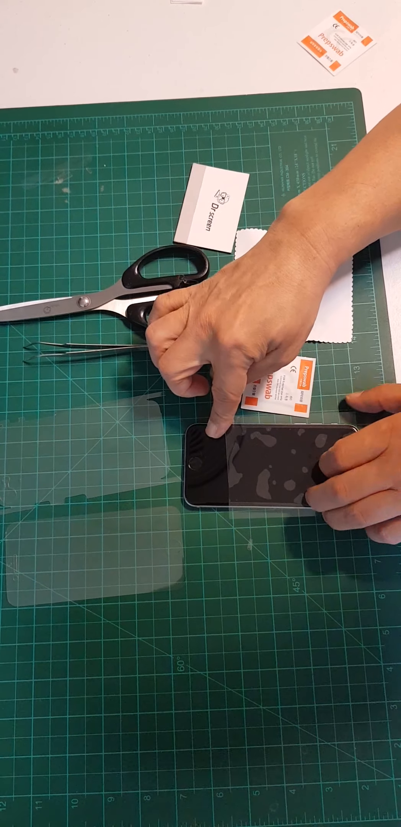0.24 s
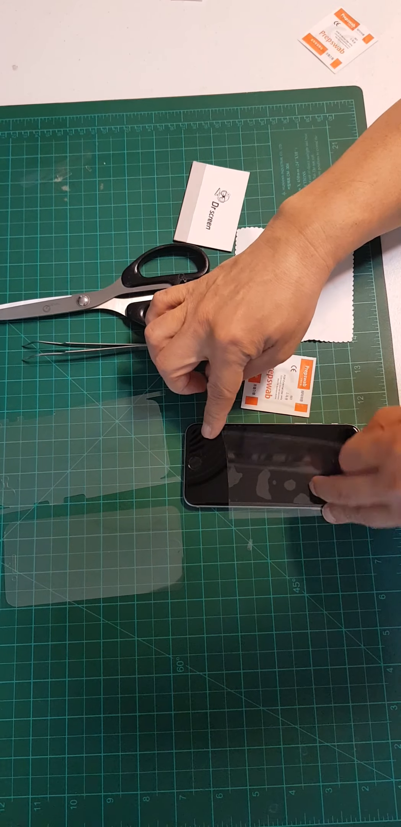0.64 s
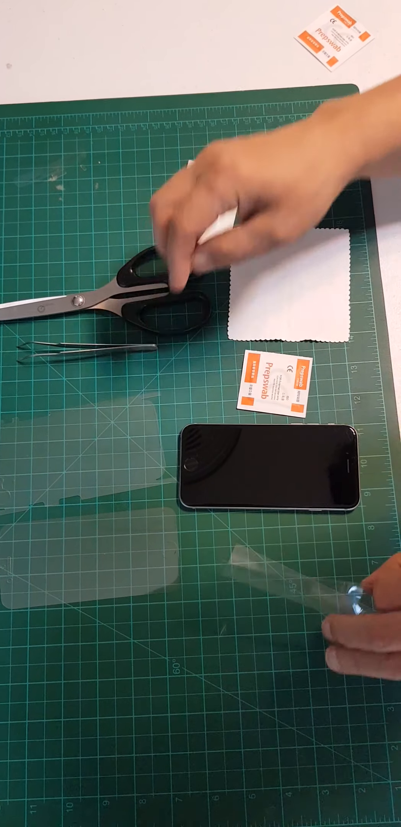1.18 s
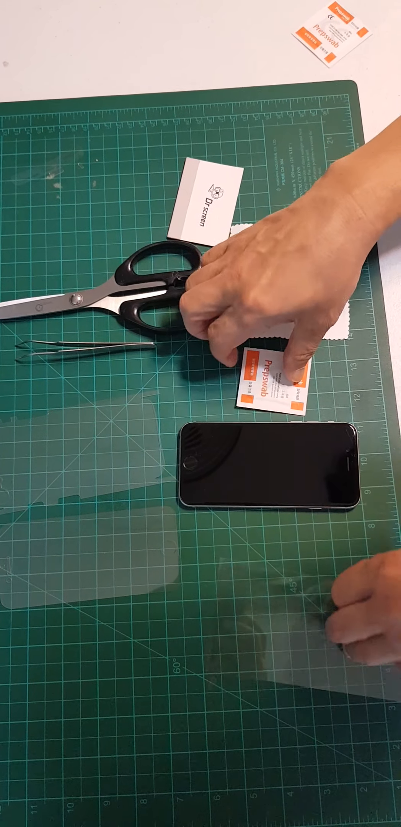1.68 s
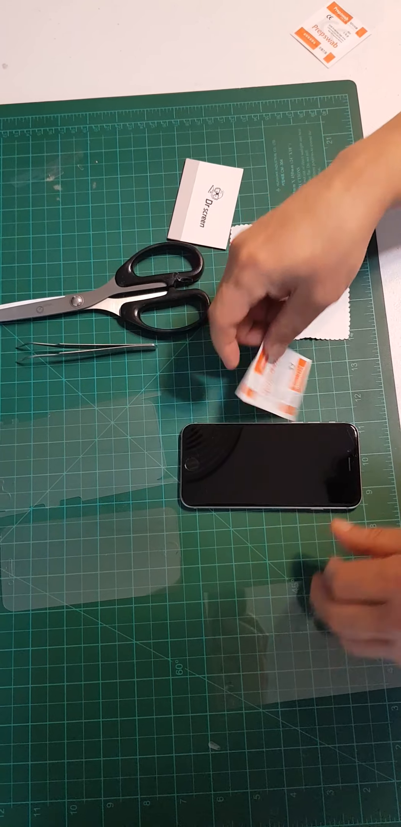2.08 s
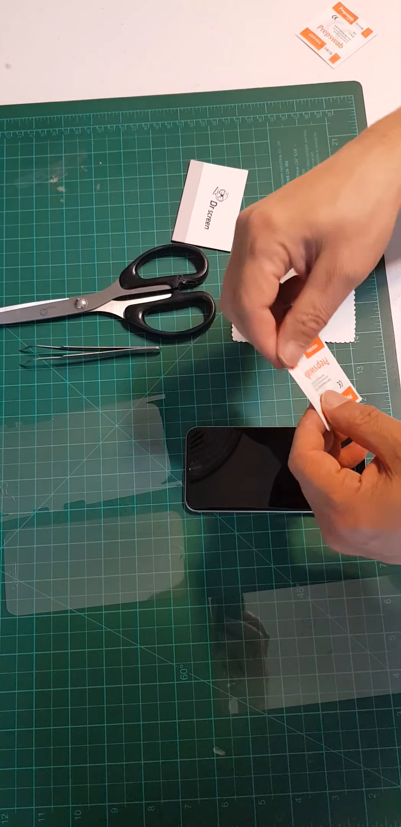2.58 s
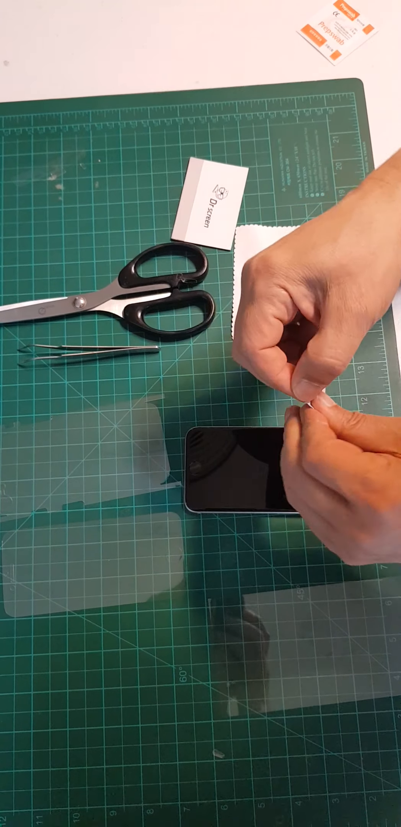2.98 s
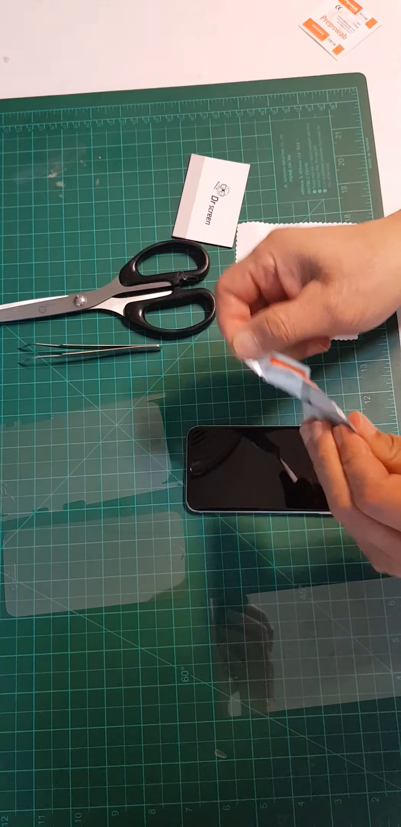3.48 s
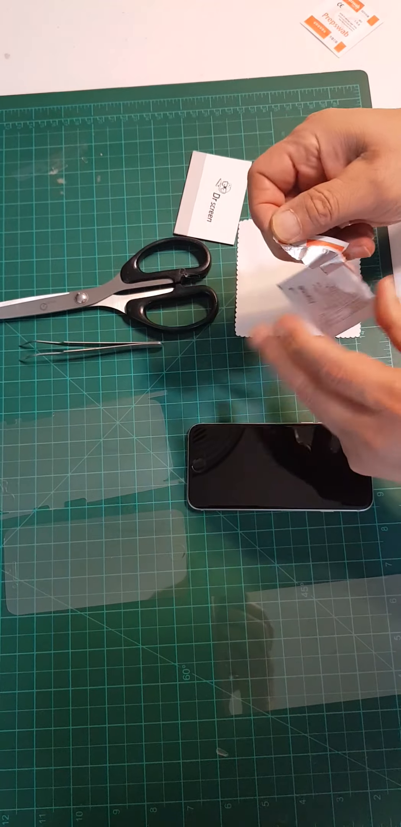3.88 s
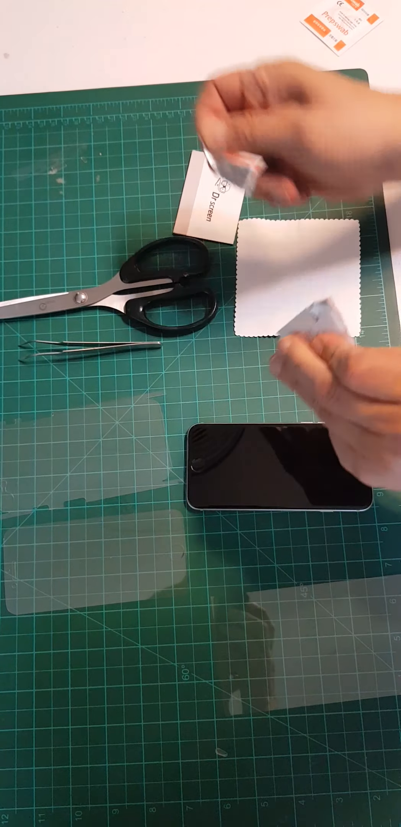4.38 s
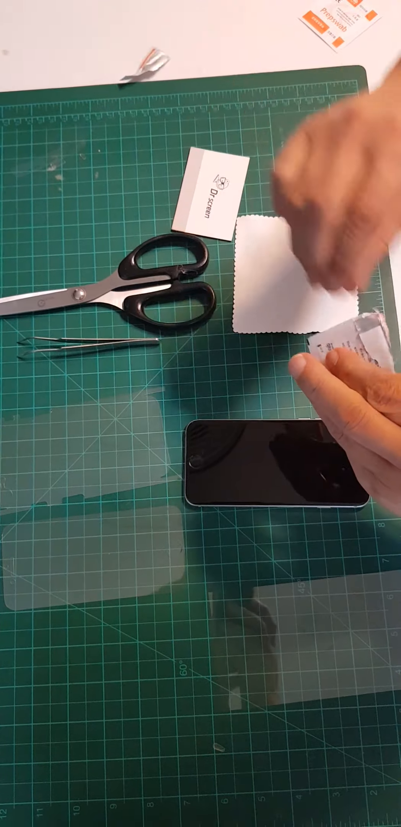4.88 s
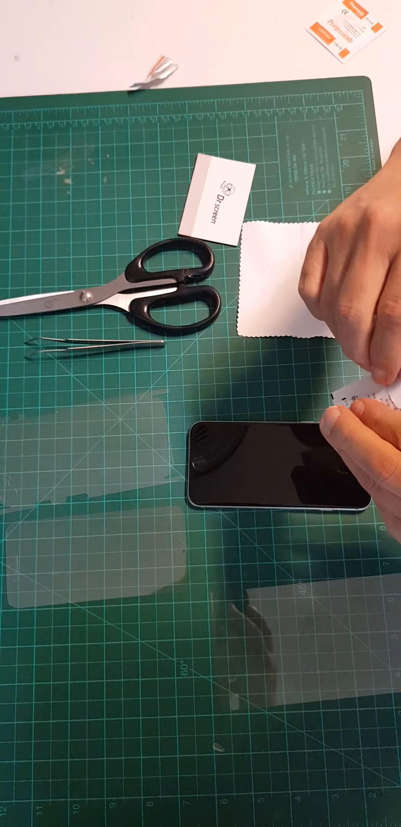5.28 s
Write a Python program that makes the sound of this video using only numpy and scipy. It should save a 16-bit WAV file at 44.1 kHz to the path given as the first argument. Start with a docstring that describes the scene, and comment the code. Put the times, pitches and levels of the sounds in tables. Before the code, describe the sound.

A film hisses, snaps free and buckles with pops, soft hand thuds follow, then foil crinkles, tears and a light strip ticks down.

```python
"""A hum and faint hiss run throughout. Hands thud on a desk; a plastic film peels off a phone in a hiss of tiny
slips, snaps free with a rip, then flaps, buckles, ticks and rings (bursts of impulses through resonances).
After soft thuds, fingers rub and crease a foil sachet, which drags over the mat; it tears in short pulls of
clumped fractures and snaps. The halves part with a crack, the torn strip clicks down and the pouch crinkles.
A small room, made of fading noise echoes, answers all of this but the hum and hiss."""
import sys
import numpy as np
from scipy import signal
from scipy.fft import rfft, irfft, next_fast_len
from scipy.io import wavfile
from scipy.ndimage import map_coordinates

SR = 44100
rng = np.random.default_rng(int(sys.argv[2]) if len(sys.argv) > 2 else 0)


def log_audio(samples):
    """Write samples as a 16-bit WAV file to the path given in sys.argv[1]."""
    # one column per channel
    frames = np.atleast_2d(samples).T
    # limit to full scale, then quantise
    limited = np.clip(frames, -1, 1)
    pcm = np.round(limited * 32767).astype(np.int16)
    wavfile.write(sys.argv[1], SR, pcm)


N = 244585

# Levels in the tables are relative: later gains may shift them.
# crackling colour of the film's edge and buckles: (f/Hz, level/dB)
CRACK_COLOUR = [(200, -33.5), (1000, -1.5), (3700, 3.5), (4600, 5.5), (5400, 6), (8000, -3), (12500, 5.5),
                (16000, -23.5)]
FREE_S = .664  # the film comes free


def amp(db):
    """Decibels to gain."""
    return 10 ** (np.asarray(db) / 20)


def unit(x):
    """Scale to rms 1."""
    return x / np.sqrt(np.mean(x ** 2) + 1e-20)


def along(points, hz):
    """Read (Hz, value) points on a log frequency axis."""
    f, v = np.transpose(points)
    return np.interp(np.log(hz + 1), np.log(f + 1), v)


def wobble(rate):
    """A smooth random curve through rate random points a second."""
    points = rng.standard_normal(int(N * rate / SR) + 4)
    return map_coordinates(points, [np.arange(N) * rate / SR])


def coloured(x, gain_db):
    """Filter without pre-echo, given its gain in dB as a function of frequency."""
    m = 2 * next_fast_len(x.shape[-1] // 2 + 2048)
    # folding the cepstrum forward in time puts all of the filter's answer after the sound
    cepstrum = irfft(np.log(amp(gain_db(np.fft.rfftfreq(m, 1 / SR)))))
    cepstrum[1:m // 2] *= 2
    cepstrum[m // 2 + 1:] = 0
    return irfft(rfft(x, m) * np.exp(rfft(cepstrum)), m)[..., :x.shape[-1]]


def hump(hz, centre, q):
    """Gain in dB of one resonance; a higher q is narrower."""
    ratio = (hz + 1) / centre
    return -10 * np.log10(1 + (q * (ratio - 1 / ratio)) ** 2)


def spread(three, apart):
    """Left and right from one shared signal and one of their own each; apart 0 is mono."""
    apart = np.clip(apart, 0, 1)
    return np.sqrt(1 - apart) * three[0] + np.sqrt(apart) * three[1:]


def crackle(count, rate, scatter_db, apart):
    """count samples of stereo impulses, about rate a second, of scattered sizes."""
    happens = rng.random(count) < rate / SR
    sizes = happens * amp(scatter_db * np.clip(rng.standard_normal(count), -2, 2))
    return sizes * spread(rng.choice([-1, 1], (3, count)), apart)


def burst(t60, gain_db, apart, attack):
    """A coloured stereo flurry; attack (s) sets its swell, t60 (s) its dying away and its loudness."""
    t = np.arange(SR // 4) / SR
    fade = amp(-60 * t / t60) * (1 - np.exp(-t / attack))
    z = rfft(fade * spread(rng.choice([-1., 1.], (3, len(t))), apart))
    # flatten most peaks of the random spectrum, so that the colour decides where it rings
    even = irfft(z / (np.abs(z) + 1e-9) ** .8, len(t)) * amp(-15 * t / t60)
    return unit(coloured(even, gain_db)) * np.sqrt(np.mean(amp(-120 * t / t60)))


def add(track, s, x):
    """Mix x into the track from time s."""
    part = track[:, max(round(s * SR), 0):][:, :x.shape[-1]]
    part += x[:, :part.shape[-1]]


def placed(x, pan_db, count):
    """Lean to the left by pan_db; the right side lags by count samples."""
    return np.array([x[0] * amp(pan_db / 2), np.roll(x[1], count) * amp(-pan_db / 2)])


def stroke(s, length, db, rise_db_per_s, fall_db_per_s):
    """Gain of one movement: it swells up to time s, holds for length seconds and fades."""
    t = np.arange(N) / SR - s
    return amp(db + rise_db_per_s * np.minimum(t, 0) - fall_db_per_s * np.maximum(t - length, 0))


def snaps(rows, spectrum, t60):
    """Single sharp snaps from (s, dB) rows."""
    out = np.zeros((2, N))
    for s, db in rows:
        add(out, s, amp(db) * burst(t60, lambda hz: along(spectrum, hz), apart=.4, attack=.0002))
    return out


def sheet(hz, pitch, q, edge):
    """Gain in dB of the bent film: loud around its pitch, weak above edge times that, with a low boom."""
    bend = amp(hump(hz, pitch, q))
    boom = amp(-14) * amp(1.5 * hump(hz, 380, q=0.42))
    treble_cut = np.sqrt(1 + (hz / (edge * pitch)) ** 6)
    return 20 * np.log10(np.hypot(bend, boom) / treble_cut)


def peel():
    """The adhesive lets go in a fine hiss of tiny slips, and the last of it in one short rip."""
    # colour of the adhesive: (f/Hz, level/dB)
    adhesive = [(700, -45.5), (2200, 8), (3500, -1), (8000, -3.5), (11500, 7.5), (16000, -14)]
    start_s, hiss_db, rise_db_per_s = .49, -62, 197.5
    rip_db, let_go_db_per_s = -26.5, 8004
    slips = crackle(N, rate=6000, scatter_db=4, apart=.6)
    lifting = stroke(start_s, FREE_S - start_s, hiss_db, rise_db_per_s, let_go_db_per_s)
    rip = stroke(FREE_S, 0, rip_db, let_go_db_per_s, let_go_db_per_s)
    hiss = unit(coloured(slips, lambda hz: along(adhesive, hz)))
    return placed((lifting + rip) * hiss, pan_db=-1.0, count=6)


def buckles():
    """Big buckles flip through singly, with a pop and a crack that softens as the film slackens."""
    # buckles of the film: (t/s, level/dB, f/Hz, q of the ring)
    buckle_rows = [(0.6637, -21, 2300, 2), (0.837, -21.5, 2750, 2.4), (1.0703, -27, 2320, 1.4),
                   (1.096, -35, 1790, 2.5), (1.1054, -25, 2170, 2.2), (1.1126, -24.5, 1920, 2.7),
                   (1.3139, -24, 2800, 2.4), (1.3183, -34.5, 3250, 2), (1.5723, -29, 1770, 0.89),
                   (1.6165, -19.5, 2245, 5.4), (1.6243, -30, 2250, 4.9)]
    t60, slacken_db_per_s = 0.013, 71
    out = np.zeros((2, N))
    for s, db, pitch, q in buckle_rows:
        # the flip is one clean kick with a short shudder of the sheet
        colour = lambda hz: sheet(hz, pitch, q, edge=2.1)
        shudder = burst(t60, colour, apart=.35, attack=.0005)
        kick = unit(coloured(signal.unit_impulse(shudder.shape[1]), colour)) * np.std(shudder)
        pop = .85 * kick + .55 * shudder
        crack = burst(t60, lambda hz: along(CRACK_COLOUR, hz), apart=.4, attack=.001)
        crack_db = -slacken_db_per_s * (s - FREE_S)
        pair = placed(pop, pan_db=-3, count=4) + amp(crack_db) * placed(crack, pan_db=3.0, count=6)
        add(out, s, amp(db) * pair)
    return out


def flaps():
    """Each wobble of the film is a run of small buckles; its face booms and its edge crackles."""
    # wobbles of the film: (t/s at the height, level/dB, f/Hz, time to rise by 30 dB/s, q of the ring)
    flap_rows = [(.677, -33.5, 2930, .025, 0.54), (.845, -25.5, 1880, 0.012, 0.59),
                 (.855, -36.5, 3080, 0.046, 1.2), (.901, -36.5, 1110, 0.051, 1.27),
                 (.924, -39.5, 1200, 0.029, 1.2), (1.087, -34.5, 800, 0.02, 1.6),
                 (1.117, -32, 1970, 0.047, 0.65), (1.129, -39, 3270, 0.045, 0.8),
                 (1.295, -48, 3570, 0.015, 1), (1.3149, -29, 2244, 0.033, 1.1),
                 (1.597, -29, 1800, 0.025, 3.2), (1.631, -48, 2150, 0.015, 2.95)]
    fall_s = 0.015  # time to die by 30 dB
    # a tighter bend rings higher and crackles more; at tight_hz edge and face match before panning
    tight_hz, crackle_db_per_octave = 3136, 41
    out, t = np.zeros((2, N)), np.arange(-SR // 8, SR // 8) / SR
    for s, db, pitch, rise, q in flap_rows:
        swell = amp(db - 30 * np.maximum(-t / rise, t / fall_s))
        crack_db = crackle_db_per_octave * np.log2(pitch / tight_hz)
        pops = crackle(len(t), rate=2000, scatter_db=2.5, apart=.35)
        face = unit(coloured(pops, lambda hz: sheet(hz, pitch, q, edge=1.64)))
        edge = unit(coloured(pops, lambda hz: along(CRACK_COLOUR, hz)))
        pair = placed(face, pan_db=0.5, count=6) + amp(crack_db) * placed(edge, pan_db=-2.0, count=6)
        add(out, s + t[0], swell * pair)
    return out


def edge_ticks():
    """The edge of the film ticks in single short snaps."""
    # ticks: (t/s, level/dB)
    tick_rows = [(.8272, -40), (.8528, -32), (1.2902, -40.5), (1.2942, -49), (1.3555, -42.5), (1.6325, -49)]
    # colour of a tick: (f/Hz, level/dB)
    edge_colour = [(500, -12), (2500, 2), (6500, -3), (12500, -2), (16000, -14)]
    return placed(snaps(tick_rows, edge_colour, t60=0.0043), pan_db=5.0, count=6)


def twangs():
    """The free edge of the film keeps ringing in a narrow band after a flick."""
    # flicks: (t/s, level/dB, f/Hz)
    twang_rows = [(0.663, -41, 4380), (1.311, -44.5, 4500)]
    out = np.zeros((2, N))
    for s, db, pitch in twang_rows:
        ring = burst(0.16, lambda hz: 2 * hump(hz, pitch, q=13), apart=.5, attack=0.0014)
        add(out, s, amp(db) * ring)
    return placed(out, pan_db=6.0, count=5)


def gliding(x, path, width_hz):
    """A resonance of fixed width whose centre follows (s, Hz) points."""
    centre = np.interp(np.arange(N) / SR, *np.transpose(path))
    # shift the centre down to 0 Hz, smooth there, then shift back up
    turn = np.exp(2j * np.pi * np.cumsum(centre) / SR)
    pole = np.exp(-2 * np.pi * width_hz / SR)
    return np.real(turn * signal.lfilter([1], np.poly([pole, pole]), x / turn))


def tear():
    """Tiny fractures run in clumps between snaps of the seam and ring the loose flap, which grows."""
    # pulls on the foil: (t/s, length/s, level/dB)
    pulls = [(3.248, 0.0064, -36.5), (3.300, 0.029, -40.5), (3.416, 0.057, -44.5), (3.561, .007, -50)]
    # single snaps of the seam: (t/s, level/dB)
    seam_rows = [(3.2143, -40.5), (3.2257, -29.5), (3.2972, -21.5), (3.3078, -23.5), (3.3622, -32.5),
                 (3.4058, -32)]
    # ring of the loose flap, lower as it grows and higher as it is pulled taut: (t/s, f/Hz)
    flap_ring = [(3.21, 2480), (3.268, 2830), (3.335, 2440), (3.41, 2660), (3.476, 2770)]
    # colour of tearing foil: (f/Hz, level/dB)
    foil = [(200, -34), (600, -16), (1200, -21.5), (1900, -19.5), (2600, 4), (3700, -2), (5300, -0.5),
            (7500, -0.5), (9500, 3.5), (11700, 8), (14000, 1), (16000, 6.5)]
    clumps = amp(1.6 * wobble(220) + 1.8 * wobble(70))
    fractures = crackle(N, rate=7000, scatter_db=3.5, apart=.4) * clumps
    fizz = unit(coloured(fractures, lambda hz: along(foil, hz)))
    short_flap = unit(coloured(fractures, lambda hz: 2 * hump(hz, 5700, q=3.8)))
    long_flap = unit(gliding(fractures, flap_ring, width_hz=390))
    t, starts = np.arange(N) / SR, [pull[0] for pull in pulls]
    # the short flap's ring gives way to the long one's, which then weakens
    young = np.interp(t, starts, [.7, 0, 0, 0])
    grown = np.interp(t, starts, [.5, 1, .8, .4])
    pulling = sum(stroke(*pull, rise_db_per_s=400, fall_db_per_s=490) for pull in pulls)
    rings = amp(-10.5) * young * short_flap + amp(-5.5) * grown * long_flap
    return pulling * (amp(4.0) * fizz + rings) + snaps(seam_rows, foil, t60=.003)


def rubs():
    """Fingers slide on the foil in uneven runs of tiny slips."""
    # slides of the fingers: (t/s, length/s, level/dB)
    rub_rows = [(1.695, 0.0097, -60.5), (1.828, 0.048, -53.5), (1.988, 0.068, -58.5), (2.092, .03, -64),
                (2.209, 0.0084, -59.5), (2.48, 0.031, -64.5), (2.645, 0.063, -70.5), (2.827, 0.015, -65.5),
                (3.072, 0.031, -62), (3.685, 0.0045, -58), (3.869, 0.15, -66.5), (4.09, 0.13, -64.5),
                (4.281, 0.042, -50.5), (4.513, 0.22, -67.5), (5.072, 0.0059, -57.5), (5.307, 0.01, -62)]
    # colour of skin on foil: (f/Hz, level/dB)
    skin = [(300, -19.5), (1000, -24.5), (2400, 2), (3600, -3.5), (6000, -4.5), (8500, -4.5), (10500, 4.5),
            (12500, 1), (14000, -7), (16000, -12.5)]
    slips = crackle(N, rate=2500, scatter_db=4, apart=.6) * amp(1.5 * wobble(60))
    rubbing = sum(stroke(*rub, rise_db_per_s=601, fall_db_per_s=249) for rub in rub_rows)
    return amp(-2.5) * rubbing * unit(coloured(slips, lambda hz: along(skin, hz)))


def creases():
    """Each crease of the foil flips with a tick that rings its own facet; fingers touching down to start a
    slide tick the same way."""
    # creases, and touches that start a slide: (t/s, level/dB, boost mostly below 3 kHz/dB, ring of the facet
    # f/Hz)
    crease_rows = [(1.993, -39.5, 1, 2880), (2.0047, -32, 8, 990), (2.0411, -34, 4, 5700),
                   (2.1395, -41.5, 19, 2090), (3.0343, -47, 15, 2300), (3.0672, -48.5, -5, 2800),
                   (3.553, -45, 17, 1200), (3.6071, -28, -4, 3000), (3.656, -42.5, -5, 7500),
                   (3.6828, -40, -18, 7400), (4.1567, -37.5, -2, 2560), (4.209, -44, -14, 5700),
                   (4.3277, -44.5, 10, 3100), (4.3473, -20.5, -3, 6960), (4.3510, -21, -1.5, 1960),
                   (4.3875, -40.5, 6, 690), (4.4436, -46, 13, 2000), (4.519, -43, 14, 5500)]
    # colour shared by the creases: (f/Hz, level/dB)
    crease_colour = [(200, -39), (500, -6), (800, -3), (1300, -9.5), (2400, 5), (3600, -4), (5000, -0.5),
                     (8000, -0.5), (12000, 2.5), (16000, -6.5)]
    out = np.zeros((2, N))
    for s, db, body_db, pitch in crease_rows:
        facet = lambda hz: 6 * amp(hump(hz, pitch, q=4.2))
        body = lambda hz: body_db / (1 + (hz / 3000) ** 2)
        colour = lambda hz: along(crease_colour, hz) + body(hz) + facet(hz)
        add(out, s, amp(db - 3.5) * burst(.01, colour, apart=.4, attack=.0006))
    return out


def sachet():
    """The foil tears, is rubbed and creases, all from one place."""
    return placed(tear() + rubs() + creases(), pan_db=0.5, count=7)


def pick_up():
    """The stiff edge of the sachet drags over the mat in tiny slips as it is lifted."""
    # the drag: (t/s, length/s, level/dB)
    drag = (2.01, 0.042, -57.5)
    # colour of the scrape: (f/Hz, level/dB)
    scrape = [(300, -16), (700, -18), (1250, 4), (1800, -6), (3000, 4), (4000, -17), (5800, -1.5),
              (8000, -14), (16000, -22)]
    slips = crackle(N, rate=1800, scatter_db=4, apart=.5)
    dragging = stroke(*drag, rise_db_per_s=1200, fall_db_per_s=194)
    return dragging * unit(coloured(slips, lambda hz: along(scrape, hz)))


def pouch():
    """Small folds give way in the squeezed, opened pouch and sound its hollow."""
    # squeezes: (t/s, length/s, level/dB)
    squeezes = [(4.308, 0.018, -62), (4.998, 0.011, -71), (5.072, 0.0097, -69), (5.306, 0.0047, -54.5)]
    # rings of the hollow: (f/Hz, q, level/dB)
    hollow_rings = [(2450, 3, -5.5), (4590, 5.7, -0.5)]
    folds = crackle(N, rate=1530, scatter_db=8.5, apart=0.78)

    def hollow(hz):
        return 20 * np.log10(sum(amp(db + 1.75 * hump(hz, centre, q)) for centre, q, db in hollow_rings))

    squeezing = sum(stroke(*squeeze, rise_db_per_s=1801, fall_db_per_s=601.5) for squeeze in squeezes)
    return placed(squeezing * unit(coloured(folds, hollow)), pan_db=-1.5, count=5)


def strip():
    """The light torn-off strip ticks on the desk as it lands and settles."""
    # touches: (t/s, level/dB)
    landing = [(4.673, -58), (4.698, -39.5), (4.712, -60)]
    # colour of the strip: (f/Hz, level/dB)
    strip_colour = [(300, -33.5), (900, -16), (1600, 6), (2000, 1), (2450, 9), (3300, 0), (4400, 3.5),
                    (7200, 11.5), (9000, -11), (12500, 4), (16000, -30.5)]
    out = np.zeros((2, N))
    for s, db in landing:
        tick = burst(0.017, lambda hz: along(strip_colour, hz), apart=0.51, attack=0.0007)
        add(out, s, amp(db) * tick)
    return placed(out, pan_db=-1.0, count=11)


def mat():
    """Soft, dull blows of the hands on the desk, which gives little deep bass."""
    # presses and knocks: (t/s, level/dB, f/Hz, fade setting t60/s)
    thuds = [(0.265, -38, 326, 0.19), (.843, -28.5, 191, 0.083), (1.112, -33.5, 205, 0.087),
             (1.661, -33.5, 143, 0.24), (1.761, -40.5, 228.3, 0.35), (1.861, -48, 290, 0.61),
             (1.984, -41, 294, 0.096)]
    desk_low_hz = 92.3  # the desk radiates little below this
    out = np.zeros((2, N))
    for s, db, pitch, t60 in thuds:
        bass_cut = lambda hz: 10 * np.log10(1 + (desk_low_hz / (hz + 1)) ** 6)
        colour = lambda hz: 2.04 * hump(hz, pitch, q=1.0) - bass_cut(hz)
        add(out, s, amp(db - 13.5) * burst(t60, colour, apart=0.023, attack=0.0023))
    return placed(out, pan_db=-0.5, count=3)


def paired(spectrum, count):
    """count samples of coloured stereo noise, more alike in the bass than in the treble."""
    # left-right likeness: (f/Hz, likeness from 0 to 1)
    alike = [(50, 0.64), (150, 0.95), (300, 0.71), (700, 0.11), (3000, 0.032), (12000, 0.11)]
    hz = np.fft.rfftfreq(count, 1 / SR)
    turn = np.arccos(np.clip(along(alike, hz), -1, 1)) / 2
    noise = rfft(rng.standard_normal((2, count))) * amp(along(spectrum, hz))
    mid, side = irfft(noise * [np.cos(turn), np.sin(turn)], count)
    return np.array([mid + side, mid - side])


def walls():
    """A near wall answers in a quick cluster, then the room dies away band by band."""
    # colour of the reflections: (f/Hz, level/dB)
    wall_colour = [(150, 3.5), (700, 2.5), (2500, -2), (6000, -2.5), (13000, -5.5)]
    # time to fade by 60 dB: (f/Hz, t60/s)
    room_fade = [(150, 0.6), (500, 0.51), (1200, 0.46), (3000, 0.39), (7000, 0.39), (14000, 0.319)]
    hz, t, z = signal.stft(paired(wall_colour, SR // 2), SR, nperseg=256)
    fade = amp(-60 * t / along(room_fade, hz)[:, None])
    tail = signal.istft(z * fade, SR, nperseg=256)[1]
    t = np.arange(tail.shape[1]) / SR
    cluster = np.exp(-((t - .011) / 0.0076) ** 2)
    return tail * np.clip(t / .002, 0, 1) * (1 + 0.54 * cluster)


def room(x):
    """The room's noise echoes are drawn afresh each fifth of a second, so that no random ring persists."""
    out, step = np.zeros((2, N)), SR // 5
    for start in range(0, N, step):
        add(out, start / SR, signal.fftconvolve(x[:, start:start + step], walls(), axes=1))
    return amp(-33.0) * out


def background():
    """An appliance hums in unsteady sine tones over low rumble and thin hiss."""
    # tones of the hum: (f/Hz, level/dB)
    hum_tones = [(118.4, -70), (145.3, -90), (177.6, -70), (209.9, -69), (296.1, -73), (328.4, -80),
                 (473.7, -81)]
    # colour of the rumble and hiss: (f/Hz, level/dB)
    air = [(20, -18), (65, -5), (90, -9), (110, -7), (180, -3), (300, -3.5), (420, -11), (600, -20),
           (1000, -24), (2000, -29.5), (4000, -35.5), (8000, -43.5), (12000, -34.5), (16000, -36)]
    t = np.arange(N) / SR
    hum = np.zeros(N)
    for f, db in hum_tones:
        level = amp(db + 2 * wobble(4)) * np.sqrt(2)
        hum += level * np.sin(2 * np.pi * f * t + .4 * wobble(4))
    noise = unit(paired(air, next_fast_len(N))[:, :N])
    return amp(-61.0) * noise + amp(0.5) * hum


def ports(x):
    """The two microphone ports favour different bands of the sound from the desk."""
    # balance of the ports: (f/Hz, left over right level/dB)
    lean = [(120, 0.5), (250, -2.5), (1000, 1.5), (2200, -4), (4000, -2), (8000, 3.5), (13000, 4)]
    left = coloured(x[0], lambda hz: along(lean, hz) / 2)
    right = coloured(x[1], lambda hz: -along(lean, hz) / 2)
    return np.array([left, right])


def scene():
    """Film, foil and hands share one room; the big buckles are sent to it slightly stronger."""
    pops = buckles()
    film = peel() + flaps() + edge_ticks() + twangs()
    handling = film + sachet() + pick_up() + pouch() + strip() + mat()
    return ports(pops + handling + room(handling + amp(1.5) * pops)) + background()


def record(dry):
    """The recorder keeps nothing above its band limit of 16 kHz."""
    m = next_fast_len(N + SR // 2)
    kept = np.fft.rfftfreq(m, 1 / SR) < 16000
    return irfft(rfft(dry, m) * kept, m)[:, :N]


dry = scene()
out = record(dry)
log_audio(out)
```